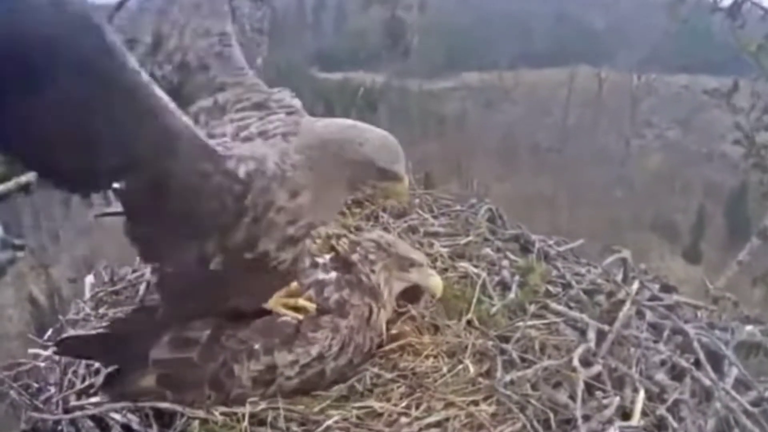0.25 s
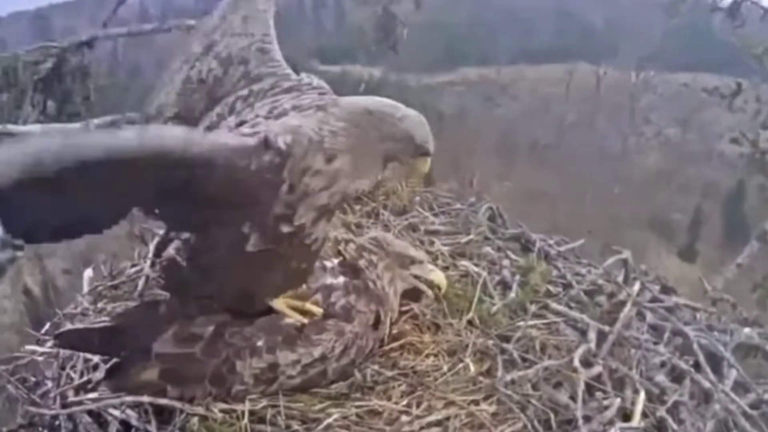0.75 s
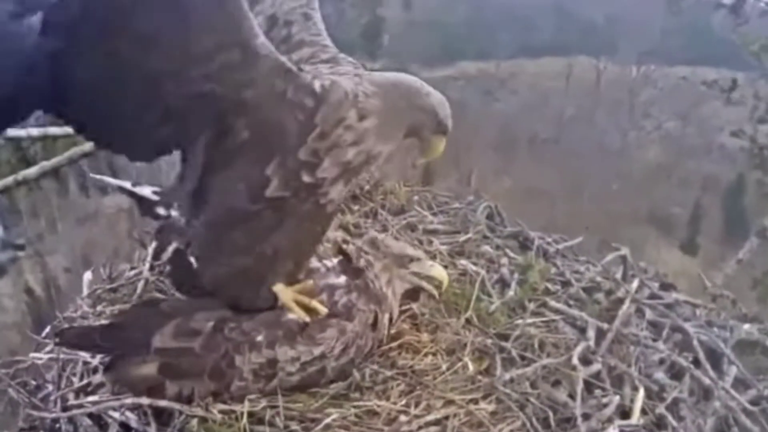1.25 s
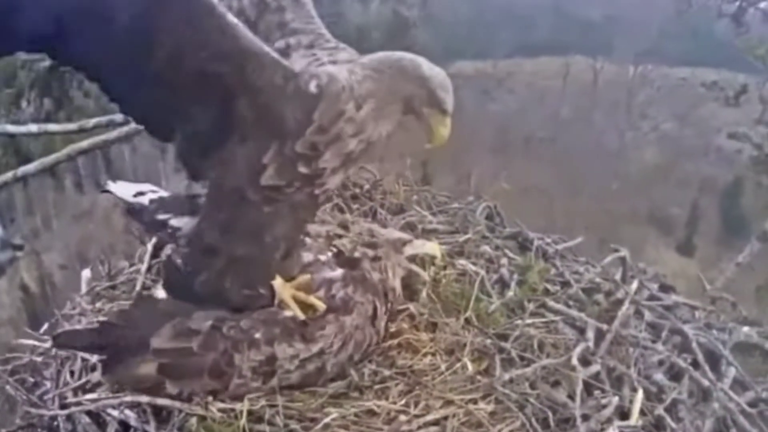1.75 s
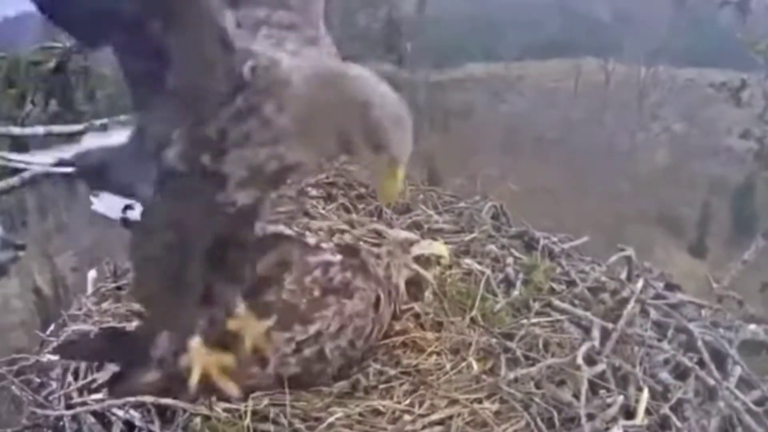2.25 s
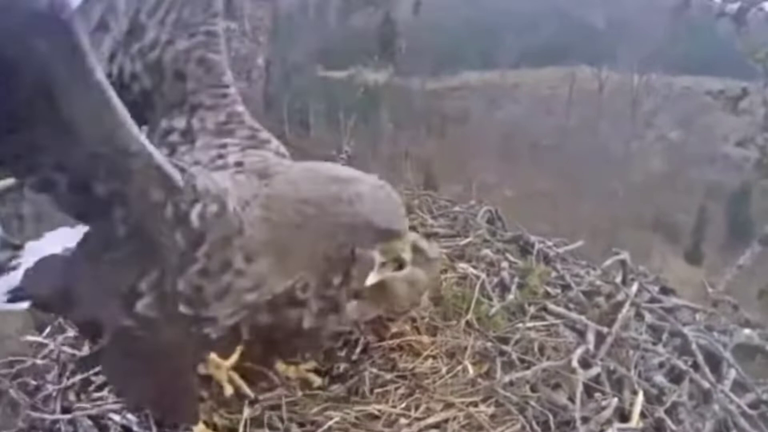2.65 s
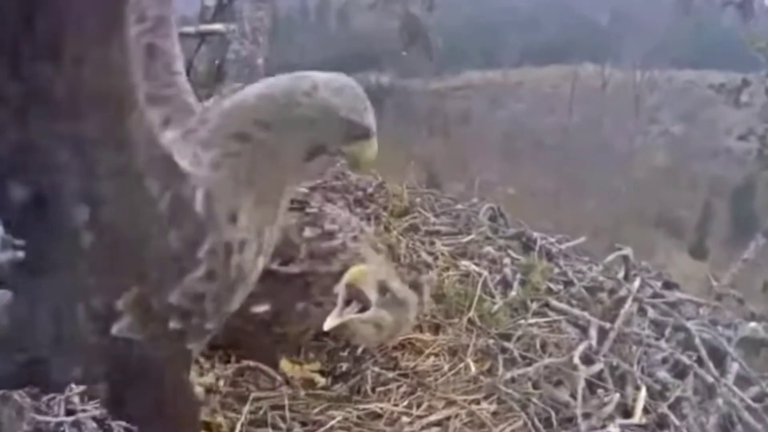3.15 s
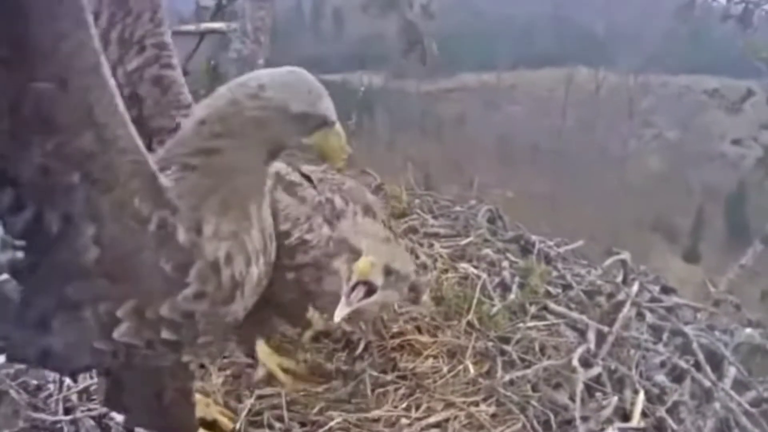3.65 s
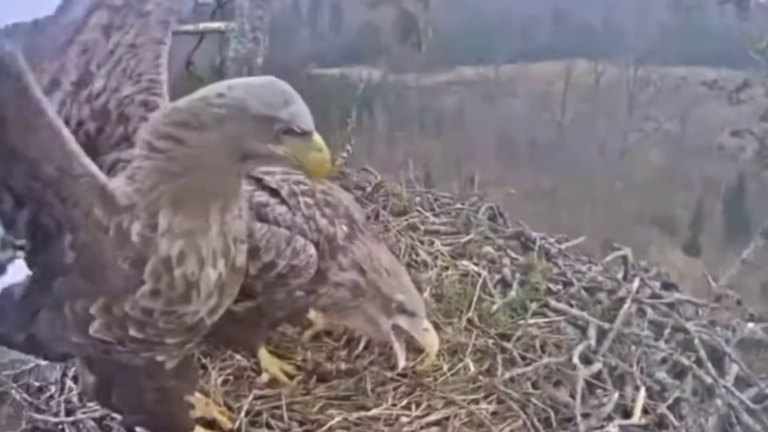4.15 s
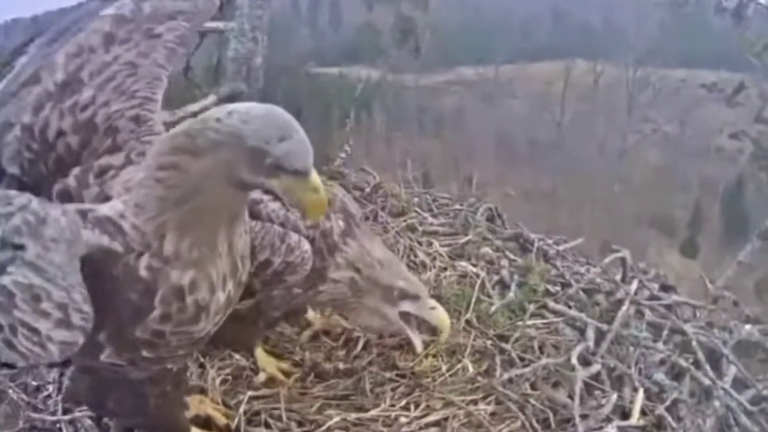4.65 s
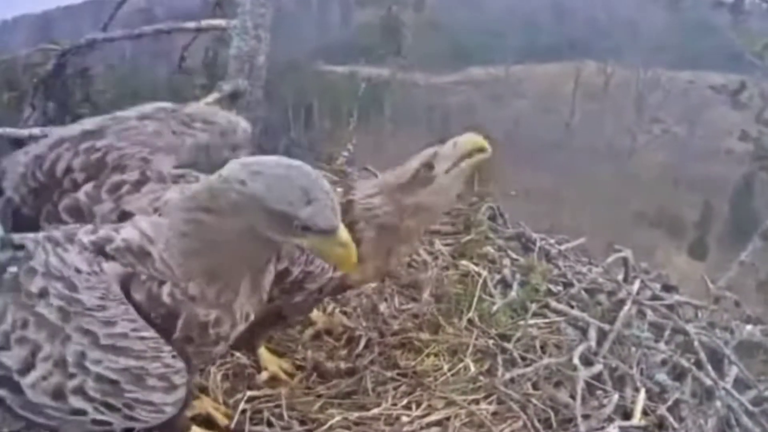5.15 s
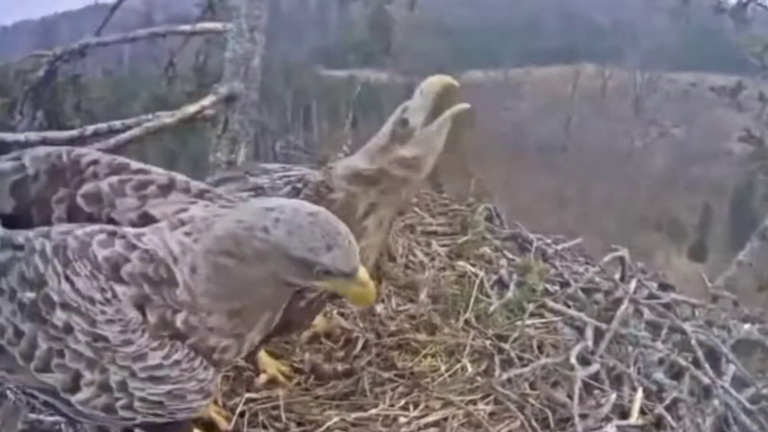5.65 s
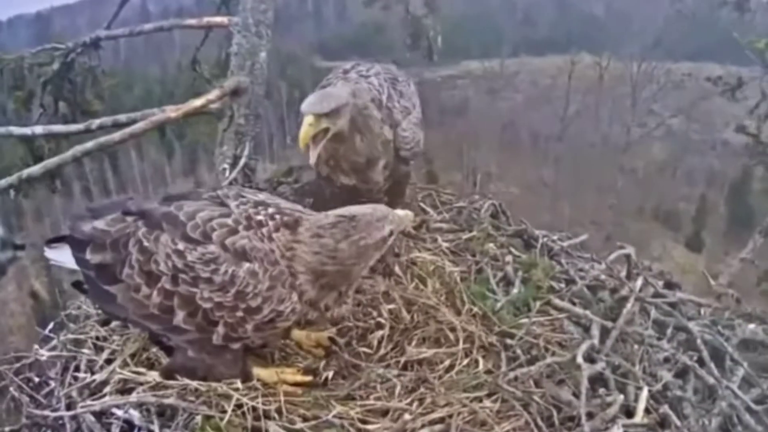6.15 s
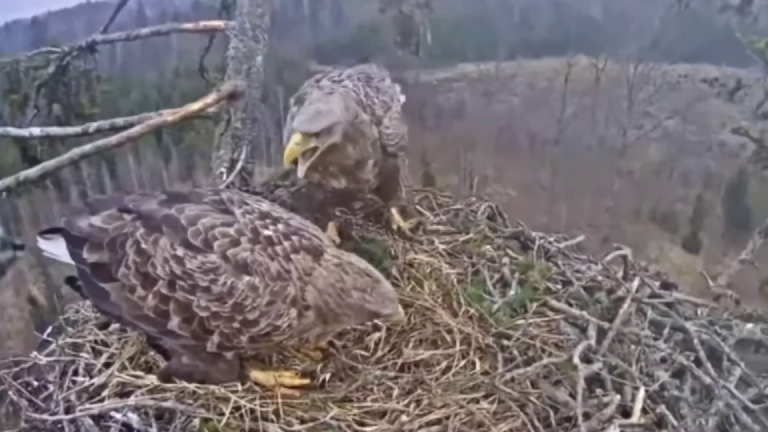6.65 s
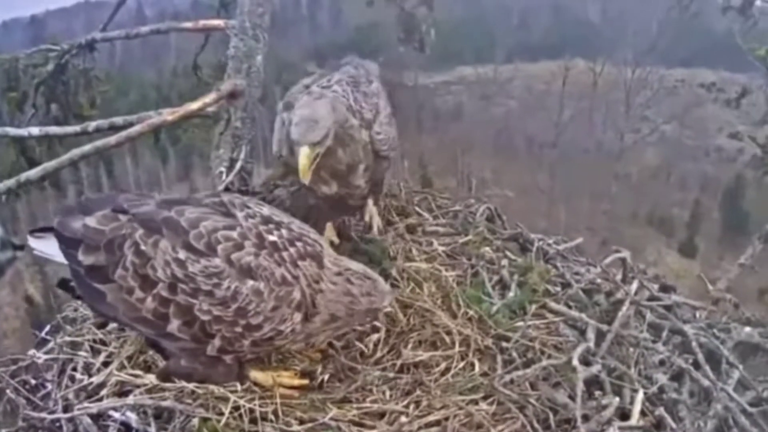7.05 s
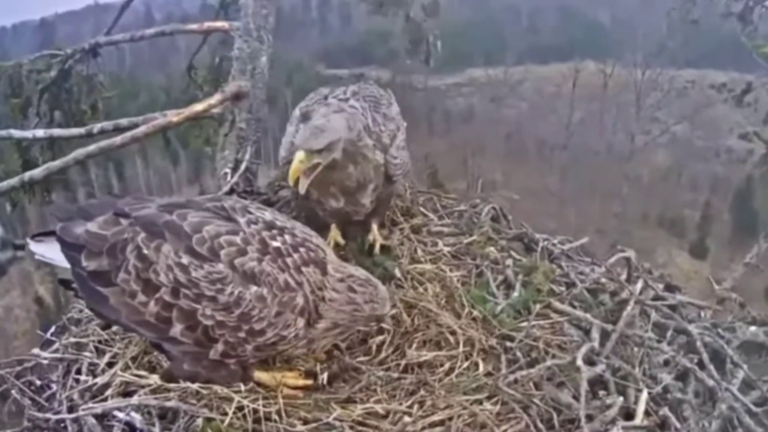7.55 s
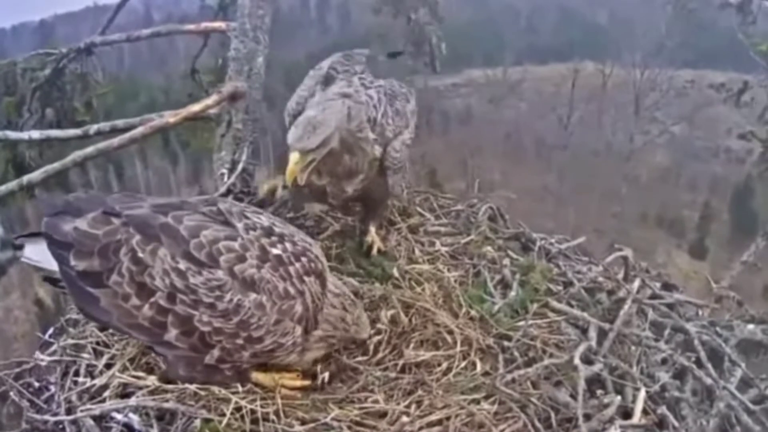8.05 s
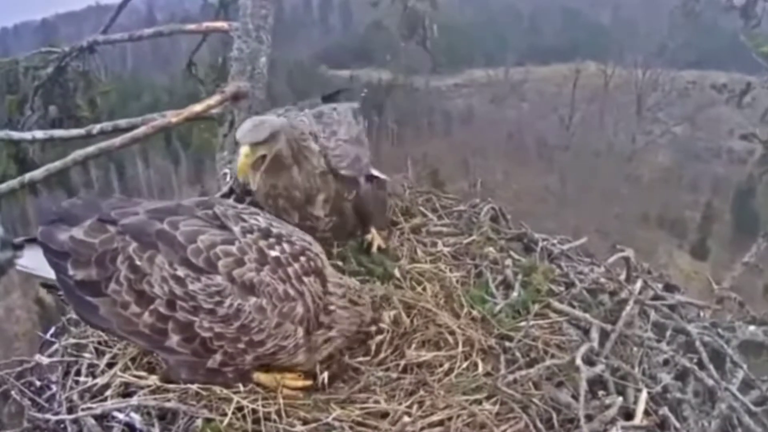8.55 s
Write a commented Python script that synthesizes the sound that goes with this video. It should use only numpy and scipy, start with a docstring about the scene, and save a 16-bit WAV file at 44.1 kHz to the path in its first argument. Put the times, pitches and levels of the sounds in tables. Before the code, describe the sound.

Wind rumbles unevenly on a microphone at a forest nest while eagles call nearby. A string of high, wavering mews builds into piercing squeals, followed by short croaks and clicks from the throat. Two sharp yips lead into evenly spaced yelps that crack upward in pitch. Feathers faintly brush the sticks, twigs tick under talons, and the softly hissing forest gives the calls a slight echo.

```python
"""A treetop nest in a forest, with two white-tailed eagles close by. Their thin mews climb to a shrill
squeal, break into croaks and throat clicks, then into a run of yelps that each flip to a higher pitch.
The calls come from the syrinx, a bird's voice box: it vibrates, and the throat and beak shape the tone.
Feathers brush the sticks, twigs tick under talons and wind rumbles on the microphone.
The forest hisses and faintly echoes the calls."""
import sys
import numpy as np
from scipy import signal
from scipy.fft import rfft, irfft, next_fast_len
from scipy.io import wavfile
from scipy.ndimage import map_coordinates

SR = 44100
rng = np.random.default_rng(int(sys.argv[2]) if len(sys.argv) > 2 else 0)


def dump(signal):
    """Clip the signal to [-1, 1] and save it as 16-bit WAV at the path in sys.argv[1]."""
    limited = np.clip(np.atleast_2d(signal).T, -1, 1)
    pcm = np.round(limited * 32767).astype(np.int16)
    wavfile.write(sys.argv[1], SR, pcm)


N = 387198
TIME = np.arange(N) / SR

# wind on the microphone: time_s, rumble_db, flutter_db
WIND_LEVELS = [(0.0, -35, -44), (0.5, -48, -52), (1.05, -48, -55), (1.42, -34.5, -46.5),
               (1.73, -44.5, -57.5), (1.82, -43, -45.5), (2.5, -42.5, -53), (2.85, -55, -61.5),
               (3.62, -56.5, -62.5), (4.349, -53.5, -55.5), (4.688, -55, -66), (4.75, -39.5, -44),
               (5.012, -37, -41.5), (5.17, -54.5, -58), (5.75, -52.5, -53), (5.819, -41, -38.5),
               (6.599, -44.5, -41.5), (6.97, -45.5, -48), (7.18, -57.5, -57), (7.45, -50, -59),
               (7.7, -46.5, -55), (8.18, -46.5, -57), (8.501, -50.5, -49), (8.78, -48, -57)]
# thumps of air from wingbeats and eddies: middle_s, half_length_s, rumble_db, flutter_db
AIR_PUFFS = [(0.05, 0.066, -43, -40.5), (0.208, 0.026, -40, -53), (0.385, 0.054, -42.5, -57),
             (0.674, 0.12, -37.5, -53.5), (1.18, 0.051, -50, -60), (2.73, 0.041, -42, -50.5),
             (2.926, 0.033, -40.5, -56.5), (3.064, 0.068, -56, -50.5), (3.487, 0.046, -42, -53.5),
             (3.818, 0.034, -51, -61), (4.126, 0.062, -44, -51.5), (5.65, 0.054, -39.5, -64),
             (6.099, 0.11, -46, -44), (7.56, 0.056, -42, -51.5), (8.54, 0.034, -39, -48.5),
             (8.666, 0.066, -50.5, -51.5)]
# soft forest hiss, swelling near 5.7 s with the rustle of a bird moving: time_s, level_db
FOREST_LEVELS = [(0.0, -64.5), (0.75, -63.5), (1.0, -66), (2.57, -66.5), (3.0, -72), (3.35, -68),
                 (4.7, -68.5), (5.28, -67), (5.72, -54.5), (7.04, -65), (7.7, -68.5), (8.78, -69)]
# mews, squeals and two yips; a note that starts as another ends is its flip into a soft whistle:
# start_s, end_s, first_hz, last_hz, scoop_share, fall_share, waver_hz, first_db, last_db, overtone_db
MEW_NOTES = [ (0.742, 0.957, 957, 900, .17, 0.031, 11.7, -45.5, -50.5, -3),
             (1.147, 1.287, 898, 962, 0.079, .13, 27.5, -49.5, -50, -6.5),
             (1.33, 1.407, 855, 1105, 0.0061, 0.31, 8.3, -48.5, -43.5, 2),
             (1.601, 1.819, 914, 979, 0.16, 0.12, 13.7, -47.5, -46, 0.5),
             (2.000, 2.251, 911, 1001, 0.11, 0.15, 10.5, -46, -47, 0.5),
             (2.419, 2.704, 891, 1196, 0, 0.5, 11.1, -47, -42.5, -2),
             (2.901, 3.238, 1001, 1102, 0.062, 0.0089, 4.2, -38.5, -40, -10),
             (3.225, 3.472, 1441, 1494, 0.021, 0.12, 9, -45.5, -50, 7),
             (3.669, 3.87, 1092, 1186, 0.17, 0.045, 5.24, -37.5, -34.5, -18.5),
             (3.861, 3.94, 1460, 1480, 0, 0.066, 9, -42, -50.5, 10),
             (4.106, 4.267, 1156, 1192, .22, 0.37, 29.4, -34.5, -36, -2),
             (4.415, 4.516, 1161, 1316, .26, 0.4, 27, -38, -32, -1),
             (4.711, 4.766, 955, 1505, 0.0091, 0.12, 33.4, -35.5, -36.5, -0.5),
             (5.875, 5.943, 1310, 1390, 0.19, 0.087, 14, -28.5, -39, -7.5),
             (6.179, 6.245, 1210, 1538, .05, 0.21, 10.9, -28.5, -39.5, -2.5)]
# the syrinx beats strong-weak, adding tones halfway between the overtones: start_s, end_s, level_db
UNEVEN_BEATS = [(0.856, 0.95, -12.5), (1.178, 1.28, -7), (2.1, 2.225, -20), (2.42, 2.49, -8.5),
                (2.51, 2.677, -21.5), (2.898, 3.208, -34), (3.3, 3.42, -19.5)]
# the voice is pressed into a shrill treble: start_s, end_s, relative_db
SHRILL_PRESSES = [(3.706, 3.855, -1), (4.132, 4.128, -9), (4.151, 4.153, -12.5), (4.757, 4.756, 0),
                  (5.02, 5.018, -18)]
# twigs ticking under the talons: start_s, peak_db
TWIG_TICKS = [(0.9846, -55.5), (8.1206, -41.5), (8.385, -49)]
# single snaps of the syrinx: start_s, peak_db
CLICKS = [(3.469, -34.5), (3.934, -29), (3.9387, -35.5), (4.2449, -34), (4.7718, -29.5), (4.785, -39.5),
          (4.7915, -41), (5.03, -43), (5.356, -37), (5.3688, -33.5), (5.6983, -38), (5.7217, -35),
          (5.7463, -35), (5.7698, -42)]
# tones that ring after a snap: pitch_hz, level_db, ring_s (time to fade by 60 dB)
CLICK_TONES = [(1390, -4.5, 0.013), (1867, 0, 0.02), (2530, -9, 0.028), (3270, -18, .008)]
# hoarse bursts: start_s, end_s, pitch_hz, level_db
CROAK_BURSTS = [(5.002, 5.017, 1116, -41.5), (5.014, 5.024, 1282, -34.5), (5.043, 5.102, 916, -51),
                (5.265, 5.282, 1274, -40.5), (5.389, 5.431, 957, -51), (5.658, 5.678, 1240, -40.5)]
# feathers brushing the nest, one list a stroke: time_s, treble_db
FEATHER_STROKES = [
    [(5.07, -81), (5.506, -69.5), (5.518, -58.5), (5.716, -72.5), (5.74, -68.5), (5.86, -79)],
    [(7.342, -57), (7.35, -56.5), (7.54, -78)],
    [(7.91, -93), (7.966, -80), (8.08, -82.5)],
]
# thin rising squeaks: start_s, first_hz, last_hz, level_db
SQUEAK_SLIDES = [(5.287, 4500, 5170, -67), (5.348, 5350, 5530, -74)]
# yelps that flip up and drop back: start_s, flip_s, drop_s, level_db, tail_relative_db
YELP_CALLS = [(6.466, 6.500, 6.523, -34, -10), (6.741, 6.769, 6.803, -32.5, -14),
              (7.020, 7.044, 7.082, -32, -15), (7.280, 7.309, 7.346, -31, -18),
              (7.541, 7.565, 7.584, -31.5, -19), (7.819, 7.839, 7.861, -30.5, -19),
              (8.113, 8.134, 8.170, -31.5, -17), (8.388, 8.411, 8.446, -32, -17),
              (8.641, 8.661, 8.697, -32, -15)]

# A tone curve says how strong a sound is from low to high. Each has: frequency_hz, gain_db
WIND_CURVE = [(12, -29.5), (20, 9), (59, 3), (189, -7.5), (278, -12.5), (471, -32.5), (600, -37),
              (780, -59.5), (1320, -120)]  # swirling air
FOREST_CURVE = [(260, -24.5), (450, -3.5), (650, -5.5), (850, 0.5), (1200, -7), (1700, -3), (2450, -7.5),
                (2900, -16), (4000, -21.5), (5200, -33), (13000, -37.5), (15500, -46)]  # soft forest hiss
THROAT_CURVE = [(450, -21.5), (880, 8), (1130, -13.5), (1350, -2), (1750, 3.5), (2250, 1), (2660, -3.5),
                (2880, -15), (3480, -9), (3880, -18.5), (4500, -23.5), (5200, -35), (7000, -48),
                (8800, -53), (11000, -74.5)]  # throat and beak
BREATH_CURVE = [(900, -7.5), (2000, 4.5), (3000, 0), (4500, 6), (6000, -7), (8600, -16.5), (9600, -29.5),
                (14000, -36.5)]  # air forced through the syrinx
SHRILL_CURVE = [(4200, -21.5), (5600, -9.5), (6750, -2), (7900, -11.5), (9200, -17.5), (11300, -17),
                (13500, -21), (15500, -37)]  # extra treble of a pressed voice
CROAK_CURVE = [(600, 3), (1000, -11), (1300, 9), (1900, -1), (2500, -6.5), (3200, -13.5), (4500, -31.5),
               (9000, -52.5)]  # the throat while croaking
WING_CURVE = [(400, -1.5), (600, 8.5), (1000, -14), (2200, -4), (3000, -5.5), (4500, -6.5), (8000, -23),
              (10000, -40), (15500, -34)]  # a folding wing
FEATHER_CURVE = [(800, -6.5), (2500, -4.5), (4000, -10.5), (7300, -6.5), (10000, -19), (15500, -34)]  # feathers on sticks
YELP_CURVE = [(900, -14.5), (1300, -7), (1750, -1), (2500, -2), (2850, -1), (3500, -10), (3900, -22.5),
              (5200, -33.5), (7000, -45.5), (8800, -51.5), (11000, -72.5)]  # the throat with the beak opened wider
TWIG_CURVE = [(1500, -9), (4000, -4), (9000, -8.0), (15000, -17)]
STICK_ECHO_CURVE = [(1000, -6), (4000, 0)]
TRUNK_ECHO_CURVE = [(1800, 2.5), (2400, -6.5), (3500, -3.5), (5500, -24)]

TOP_HZ = 15450
SCOOP_S, FALL_S, WAVER_SHARE = .02, .018, .011  # a note scoops up, wavers, then falls away
ATTACK_DB, ATTACK_S = -12.5, 0.012  # a note starts this much softer and swells
RELEASE_DB, RELEASE_S = -67, 0.0091  # level lost at the end, per share of pitch that falls
QUAVER_HZ, QUAVER_SHARE, QUAVER_S = 28, 0.054, 0.083  # the voice trembles as it first starts up
UNSTEADY_SHARE, UNSTEADY_DB = .0045, 1.3  # random wobble of pitch and loudness
GAPE_DB, SOFT_DULL_DB = -10.5, -4  # at most: a wide beak weakens low tones, a soft voice loses treble


def undb(db):
    """Turn decibels into a number to multiply by."""
    return 10 ** (np.asarray(db) / 20)


def unit(x):
    """Scale a sound to an average strength (rms) of 1."""
    return x / np.sqrt(np.mean(x ** 2) + 1e-20)


def curve_gain(curve, hz):
    """Read a tone curve's gain at any frequency."""
    curve_hz, db = np.transpose(curve)
    return undb(np.interp(np.log(np.maximum(hz, 1)), np.log(curve_hz), db))


def shape(x, curve):
    """Pass a short sound through a tone curve."""
    size = next_fast_len(len(x) + 1024)
    return irfft(rfft(x, size) * curve_gain(curve, np.fft.rfftfreq(size, 1 / SR)), size)[:len(x)]


def noise(curve, size=N):
    """Noise of strength 1 that follows a tone curve."""
    gain = curve_gain(curve, np.fft.rfftfreq(size, 1 / SR))
    return unit(irfft(rfft(rng.standard_normal(size)) * gain, size))


def wander(rate_hz, size=N):
    """Smooth random drifting with a spread near 1."""
    steps = np.arange(size) * rate_hz / SR
    return map_coordinates(rng.standard_normal(int(steps[-1]) + 2), [steps], order=3, mode="nearest")


def add(out, start_s, x):
    """Mix x into out from a given time on."""
    i = max(int(start_s * SR), 0)
    out[i:i + len(x)] += x[:max(N - i, 0)]


def trace(rows):
    """Join a table's rows with straight lines: the times, then each column."""
    times, *columns = np.transpose(rows)
    t = np.arange(times[0], max(times[-1], times[0] + .004), 1 / SR)
    return t, *(np.interp(t, times, column) for column in columns)


def fade(t, edge_s):
    """Round off a sound's start and end."""
    return np.sin(np.pi / 2 * np.clip(np.minimum(t - t[0], t[-1] - t) / edge_s, 0, 1))


def wind(rumble_swing_db=2.0, flutter_swing_db=3.0, split_hz=110):
    """Big swirls of air rumble on the microphone, small ones flutter, and puffs thump on top."""
    times, rumble_db, flutter_db = np.transpose(WIND_LEVELS)
    rumble_gain = undb(np.interp(TIME, times, rumble_db) + rumble_swing_db * wander(18))
    flutter_gain = undb(np.interp(TIME, times, flutter_db) + flutter_swing_db * wander(35))
    for middle, half_length, puff_rumble_db, puff_flutter_db in AIR_PUFFS:
        swell = np.hanning(int(2 * half_length * SR))
        for gain, db in (rumble_gain, puff_rumble_db), (flutter_gain, puff_flutter_db):
            add(gain, middle - len(swell) / SR / 2, undb(db) * swell)
    swirls = rfft(noise(WIND_CURVE))
    small_share = 1 / (1 + (split_hz / np.maximum(np.fft.rfftfreq(N, 1 / SR), 1)) ** 8)
    rumble = unit(irfft(swirls * np.sqrt(1 - small_share), N))
    flutter = unit(irfft(swirls * np.sqrt(small_share), N))
    return rumble_gain * rumble + flutter_gain * flutter


def forest(restless_db=1.3):
    """A soft forest hiss, swelling near 5.7 s with the rustle of a bird moving."""
    level_db = np.interp(TIME, *np.transpose(FOREST_LEVELS))
    return noise(FOREST_CURVE) * undb(level_db + restless_db * wander(6.2))


def overtones(phase, hz, curve, multiples, overtone_db=0):
    """Tones at multiples of the pitch, shaped by a curve; overtone_db acts mostly at 3-5 kHz."""
    k = multiples[:, None]
    in_band = np.clip((k * hz - 2650) / 350, 0, 1) * np.clip((7000 - k * hz) / 2000, 0, 1)
    strength = undb(overtone_db * in_band) * (k * hz < TOP_HZ)
    power = ((strength * curve_gain(curve, k * hz)) ** 2).sum(0) / 2
    return shape((strength * np.sin(k * phase)).sum(0), curve) / np.sqrt(power)


def pressing(t, rise_db_per_s=1402, tire_db_per_s=77, fall_db_per_s=2200):
    """Strength of the shrill treble: each press of the voice comes on fast, tires and lets go."""
    return sum(undb(db - rise_db_per_s * np.maximum(start - t, 0)
                    - tire_db_per_s * np.maximum(t - start, 0)
                    - fall_db_per_s * np.maximum(t - end, 0)) for start, end, db in SHRILL_PRESSES)


def syrinx(t, hz, rasp, uneven=0, relax_db=0, overtone_db=0, throat=THROAT_CURVE, air_db=-45):
    """The voice box vibrates and leaks air; rasp shakes its pitch and strength from beat to beat."""
    size = len(t)
    hz = hz * (1 + .0035 * wander(110, size))
    shaken_hz = hz * (1 + (.003 + .11 * rasp) * wander(900, size))
    phase = 2 * np.pi * np.cumsum(shaken_hz) / SR
    multiples = np.arange(1, 17)
    flicker_db = 3.5 * np.array([wander(35, size) for _ in multiples])  # each overtone on its own
    voice = overtones(phase, hz, throat, multiples, overtone_db + relax_db + flicker_db)
    voice += uneven * overtones(phase, hz, throat, multiples - .5)
    shrill = overtones(phase, hz, SHRILL_CURVE, multiples) * (1 + .05 * wander(1200, size))
    voice += pressing(t) * shrill
    voice *= 1 + (.03 + .45 * rasp) * wander(400, size)
    breath = undb(air_db + relax_db) * noise(BREATH_CURVE, size)
    return (voice + breath) * fade(t, edge_s=0.0046)


def mews(catch_s=0.023, fray=0.95, fray_s=0.0092):
    """Drawn-out notes that start rough, scoop up and clear, then fray as the pitch falls away."""
    out = np.zeros(N)
    for (start, end, first_hz, last_hz, scoop, fall, waver_hz,
         first_db, last_db, overtone_db) in MEW_NOTES:
        t, hz, db = trace([(start, first_hz, first_db), (end, last_hz, last_db)])
        age_s, left_s, calling_s = t - start, t[-1] - t, t - MEW_NOTES[0][0]
        waver = WAVER_SHARE * np.sin(2 * np.pi * waver_hz * age_s)
        quaver = QUAVER_SHARE * np.cos(2 * np.pi * QUAVER_HZ * calling_s) * np.exp(-calling_s / QUAVER_S)
        hz *= (1 - scoop * np.exp(-age_s / SCOOP_S)) * (1 - fall * np.exp(-left_s / FALL_S))
        hz *= 1 + waver + quaver
        db += ATTACK_DB * np.exp(-age_s / ATTACK_S) + RELEASE_DB * fall * np.exp(-left_s / RELEASE_S)
        force = np.clip(undb(db.max() + 37), 0, 1)  # louder notes are rougher
        if start > CROAK_BURSTS[-1][0]:
            force *= 0.31  # the voice eases after the croaks
        rasp = force * (np.exp(-(age_s / catch_s) ** 2) + fray * np.exp(-left_s / fray_s))
        uneven = sum(undb(level_db) * np.clip(np.minimum(t - on, off - t) / 0.0031, 0, 1)
                     for on, off, level_db in UNEVEN_BEATS)
        hz *= 1 + UNSTEADY_SHARE * wander(45, len(t))
        db += UNSTEADY_DB * wander(30.3, len(t))
        relax_db = 0.38 * (db - db.max())  # soft is also dull
        throat = [(f, gain_db + GAPE_DB * force * (f < 1000) + SOFT_DULL_DB * (1 - force) * (f > 4000))
                  for f, gain_db in THROAT_CURVE]
        voice = syrinx(t, hz, rasp, uneven, relax_db, overtone_db, throat, air_db=-42)
        add(out, start, undb(db) * voice)
    return out


def echo(x, level_db, ring_s, curve):
    """Sound scatters back as a blurred copy that fades by 60 dB in ring_s."""
    t = np.arange(SR) / SR
    tail = noise(curve, len(t)) * undb(-60 * t / ring_s) * (1 - np.exp(-40 * t / ring_s))
    return undb(level_db) * signal.fftconvolve(x, tail / np.sqrt(np.sum(tail ** 2)))[:N]


def twigs(decay_s=0.0016):
    """Twigs tick under the talons, each a tiny burst of noise."""
    out = np.zeros(N)
    t = np.arange(SR // 50) / SR
    for start, db in TWIG_TICKS:
        tick = noise(TWIG_CURVE, len(t)) * np.exp(-t / decay_s)
        add(out, start, undb(db) * tick / np.abs(tick).max())
    return out


def throat_clicks(droop_per_s=8):
    """The syrinx snaps as a note dies or fails to start; the ring droops as the throat slackens."""
    out = np.zeros(N)
    t = np.arange(SR // 30) / SR
    phase_per_hz = 2 * np.pi * (t - droop_per_s * t ** 2 / 2)
    for start, db in CLICKS:
        ring = np.zeros(len(t))
        for hz, tone_db, ring_s in CLICK_TONES:
            hz *= 1 + 0.1 * rng.standard_normal()
            ring += undb(tone_db - 60 * t / ring_s) * np.sin(phase_per_hz * hz)
        ring *= 1 - np.exp(-t / 0.002)
        add(out, start, undb(db) * ring / np.abs(ring).max())
    return out


def croaks():
    """Between squeals and yelps the voice only catches, in hoarse bursts."""
    out = np.zeros(N)
    for start, end, pitch_hz, db in CROAK_BURSTS:
        t, hz = trace([(start, pitch_hz), (end, pitch_hz)])
        add(out, start, undb(db) * unit(syrinx(t, hz, rasp=1.27, throat=CROAK_CURVE)))
    return out


def feathers():
    """A wing folds, then feathers sweep the sticks; their tiny barbs catch and let go."""
    out = np.zeros(N)
    treble_filter = signal.butter(4, 4200, "high", fs=SR, output="sos")
    for stroke, curve in zip(FEATHER_STROKES, [WING_CURVE, FEATHER_CURVE, FEATHER_CURVE]):
        t, treble_db = trace(stroke)
        rustle = noise(curve, len(t)) * undb(0.94 * wander(250, len(t)))
        rustle /= signal.sosfilt(treble_filter, rustle).std()
        add(out, t[0], undb(treble_db) * rustle * fade(t, edge_s=0.0055))
    return out


def squeaks(length_s=.016):
    """The voice catches in thin squeaks, each one pure rising tone."""
    out = np.zeros(N)
    for start, first_hz, last_hz, db in SQUEAK_SLIDES:
        t, hz = trace([(start, first_hz), (start + length_s, last_hz)])
        tone = np.sin(2 * np.pi * np.cumsum(hz) / SR)
        add(out, start, undb(db) * unit(tone * fade(t, edge_s=.006)))
    return out


def yelps(low_hz=1200, crest_hz=1460, flip_hz=1780, sag_hz=1650, creak_hz=53.6):
    """Each yelp slides up, flips to a high voice that sags, and drops into a short creaky tail."""
    out = np.zeros(N)
    for start, flip, drop, db, tail_db in YELP_CALLS:
        # the three parts: time_s, pitch_hz, relative_db
        rise = [(start, low_hz, -11), ((start + flip) / 2, (low_hz + crest_hz) / 2 - 15, 0),
                (flip + 0.0031, crest_hz, -9)]
        high = [(flip - .002, flip_hz, 1.5), ((flip + drop) / 2, (flip_hz + sag_hz) / 2 + 15, -1),
                (drop + 0.0017, sag_hz, -14)]
        tail = [(drop - .002, 1340, tail_db), (drop + .022, 1220, tail_db - 6)]
        for part, roughness, creak in (rise, .11, 0), (high, .12, 0), (tail, .45, 0.65):
            t, hz, part_db = trace(part)
            rasp = roughness + .22 * np.exp((t[0] - t) / .004)
            relax_db = np.minimum(90 * (hz / hz[0] - 1), 0)  # overtones die as the pitch sags
            air_db = -27 - 450 * np.abs(t - flip)  # most air escapes at the flip
            hz *= 1 + .008 * rng.standard_normal()
            voice = syrinx(t, hz, rasp, relax_db=relax_db, overtone_db=-2,
                           throat=YELP_CURVE, air_db=air_db)
            pulse_hz = creak_hz * rng.uniform(.8, 1.25)
            pulses = 1 - creak * np.cos(2 * np.pi * pulse_hz * (t - t[0]))
            add(out, t[0], undb(db + part_db) * pulses * voice)
    return out


def scene():
    """Mix it all; nest sticks scatter the calls at once, far trunks later and duller."""
    calls = mews() + yelps() + croaks() + throat_clicks() + squeaks()
    sticks = echo(calls, level_db=-17, ring_s=.04, curve=STICK_ECHO_CURVE)
    trunks = echo(calls, level_db=-44.5, ring_s=0.86, curve=TRUNK_ECHO_CURVE)
    return (calls + sticks + trunks + feathers() + twigs() + wind() + forest())[None]


def record(dry):
    """Cut away the very highest treble."""
    return signal.sosfilt(signal.ellip(8, .2, 70, TOP_HZ, fs=SR, output="sos"), dry)


dry = scene()
out = record(dry)
dump(out)
```